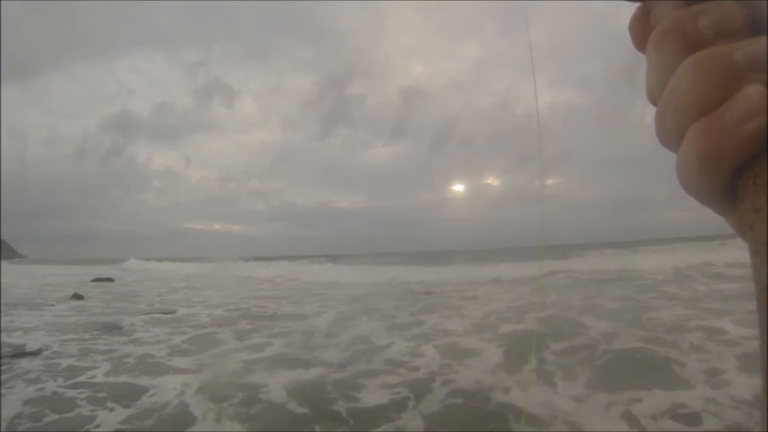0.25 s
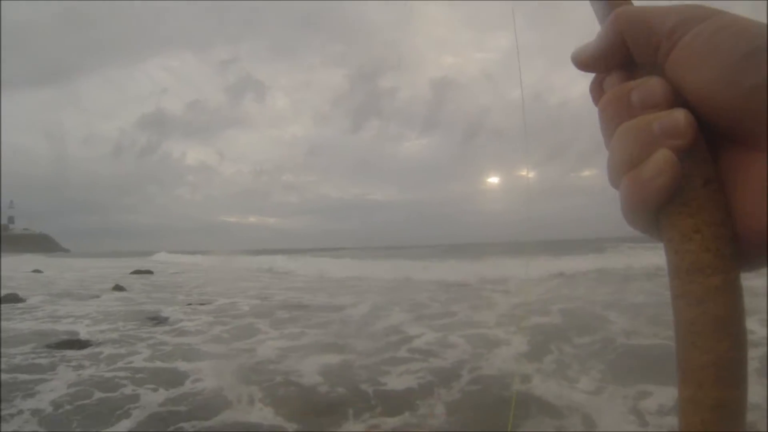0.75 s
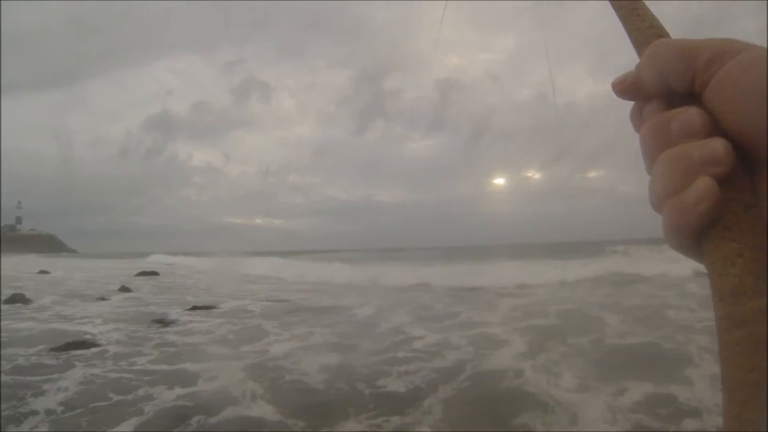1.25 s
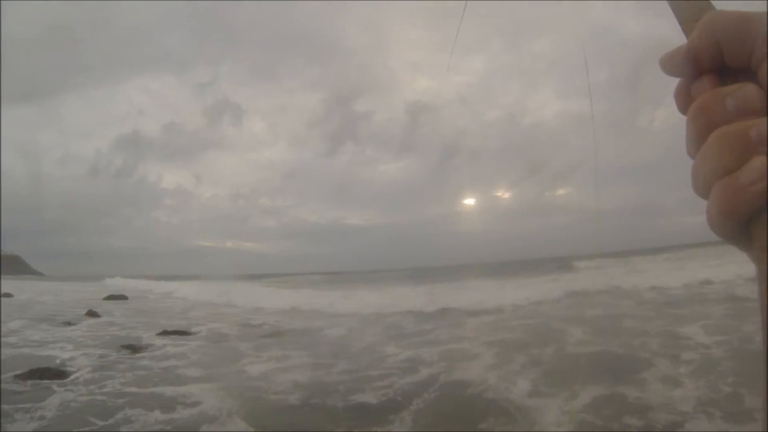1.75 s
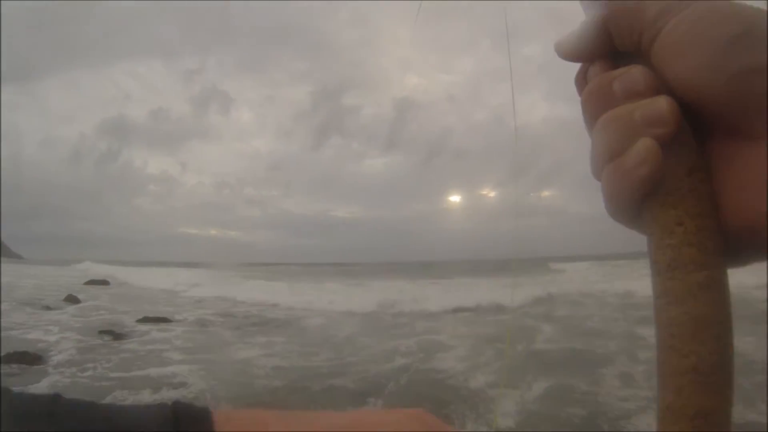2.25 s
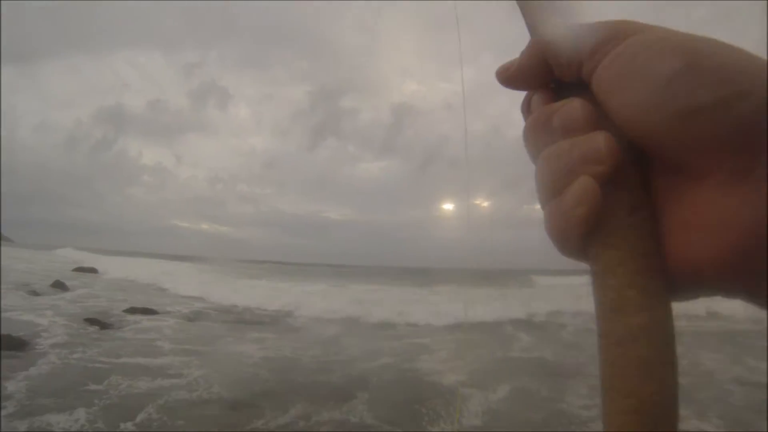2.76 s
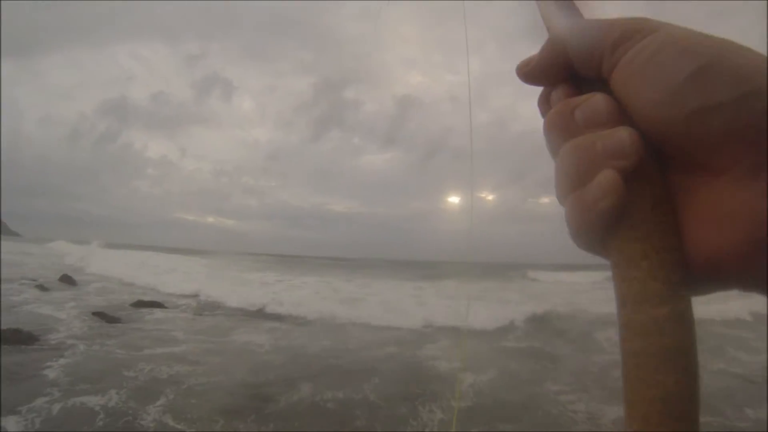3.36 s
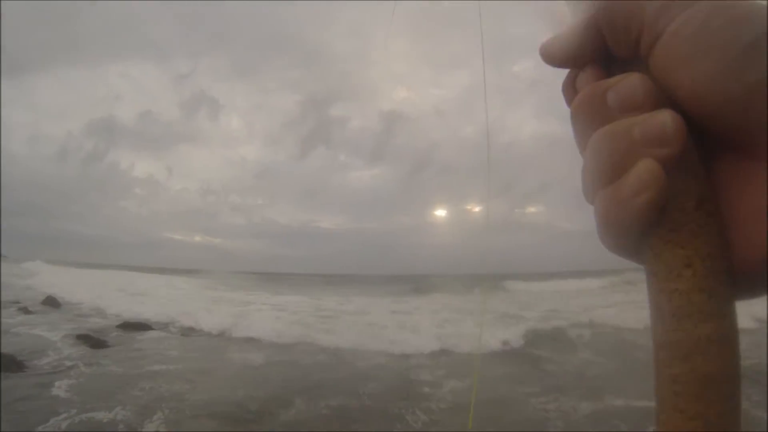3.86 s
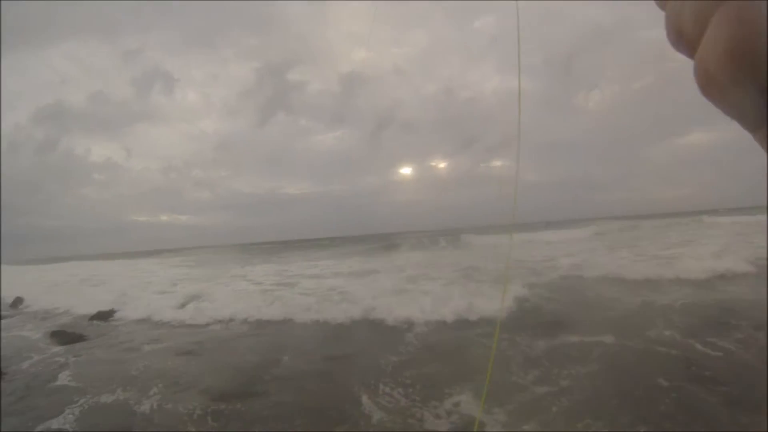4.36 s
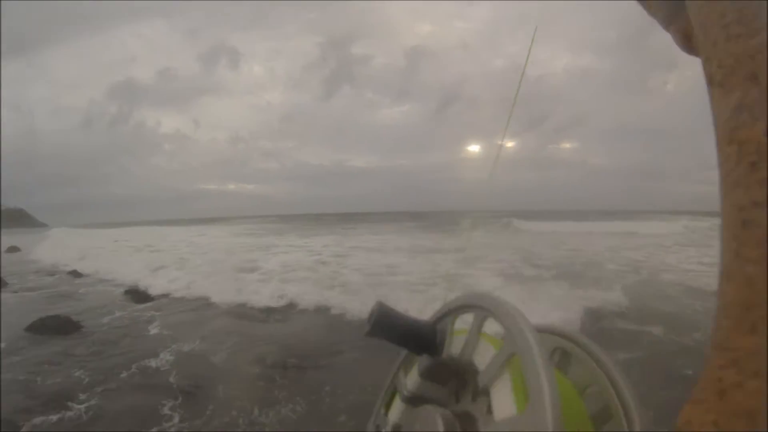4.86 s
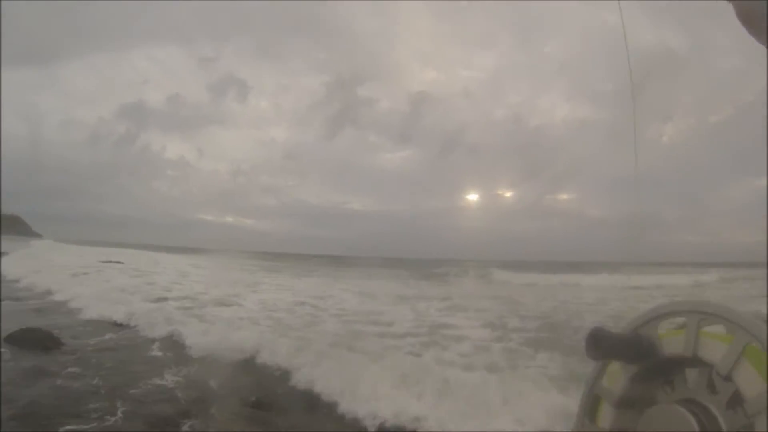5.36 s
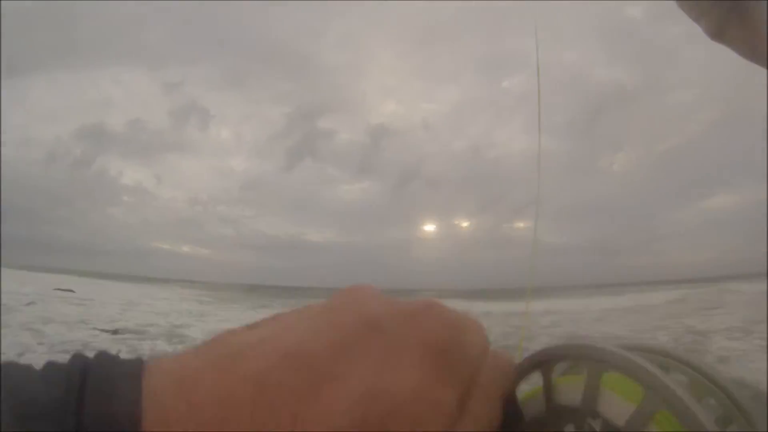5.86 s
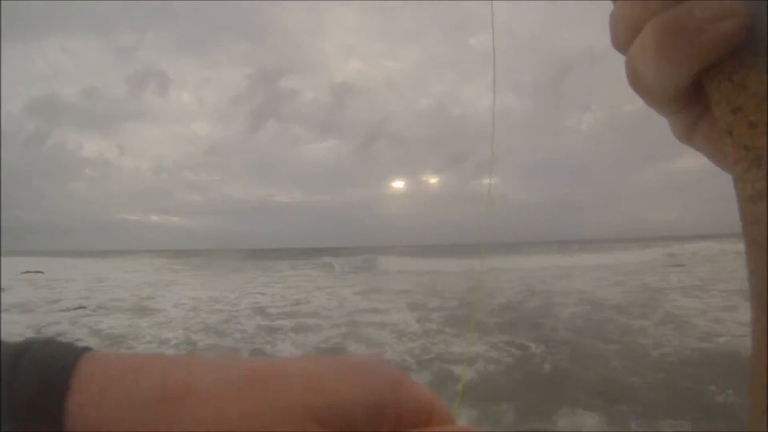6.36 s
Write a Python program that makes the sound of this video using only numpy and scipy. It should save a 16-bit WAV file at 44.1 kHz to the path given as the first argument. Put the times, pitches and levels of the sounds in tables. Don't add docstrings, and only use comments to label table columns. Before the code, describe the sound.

A boxy, muffled close microphone on a fisherman's chest picks up steady breaking waves outdoors. Soft low thuds and strap strain rise and fall with movement, dotted with tiny gritty clicks. Very quiet, high electronic ticking flutters in short runs above the hiss. Late on, a jerk brings two hard, hollow knocks close together and a short scrape, then the surf slides nearer and foamier.

```python
import sys
import numpy as np
from scipy import signal
from scipy.fft import rfft, irfft, next_fast_len
from scipy.io import wavfile
from scipy.ndimage import uniform_filter1d, map_coordinates

SR = 44100
rng = np.random.default_rng(int(sys.argv[2]) if len(sys.argv) > 2 else 0)


def generate_wav(sig):
    pcm = np.round(np.clip(np.atleast_2d(sig).T, -1, 1) * 32767).astype(np.int16)
    wavfile.write(sys.argv[1], SR, pcm)


def decibels_to_gain(level_db):
    exponent = np.asarray(level_db, float) / 20
    return 10 ** exponent


N = 291942
TIME = np.arange(N) / SR

# (time [s], level [dB])
SURGE = [(0.0, -70.5), (0.48, -71.5), (0.87, -66.5), (1.4, -67), (1.58, -60), (1.75, -65.5), (1.95, -69),
         (2.36, -69.5), (2.71, -69), (2.95, -66.5), (3.98, -67.5), (4.66, -67), (4.92, -63.5),
         (5.07, -62.5), (5.42, -65.5), (6.4, -63.5), (6.62, -64.5)]
# (frequency [Hz], level [dB])
ROAR = [(150, -38), (300, -2), (700, -1.5), (1000, -4.5), (2000, -33)]
WASH = [(500, -33), (900, -5.5), (1400, 3), (2800, 0.5), (4000, -13), (8000, -37)]
FOAM = [(1500, -46), (3000, 4), (5000, 5.5), (8000, -0.5), (12000, -8), (16000, -13)]
# (centre [Hz], width [Hz], level [dB])
HOUSING = [(380, 280, -7), (642, 202, -0.5), (1025, 820, -16.5), (1376, 390, 1.5), (2096, 425, -4.5),
           (2595, 450, -12.5), (3500, 300, -5.5), (4090, 1560, -9), (5200, 990, -8.5), (6480, 750, -8),
           (7500, 330, -11), (10700, 6000, -9.5)]
RUNUP_S, RUNUP_LASTS_S = 3.94, 2.8
ROAR_DB, ROAR_FOLLOWS, ROAR_NEAR_DB = -68.5, 0.37, -1
ROAR_TURNS = 0.22
WASH_DB = -66.5
FOAM_DB, FOAM_FOLLOWS, FOAM_NEAR_DB = -79, 0.31, 7.5

# (time [s], level [dB])
EFFORT = [(0.0, -65), (0.61, -64.5), (0.81, -53), (1.23, -60), (1.53, -54.5), (1.64, -55.5), (2.4, -65),
          (2.84, -59), (2.97, -61.5), (3.82, -61), (3.95, -59), (4.35, -61), (4.85, -56), (5.33, -54),
          (5.46, -59), (5.79, -64.5), (6.05, -64), (6.62, -62)]
# (frequency [Hz], level [dB])
BUFFET = [(6, -41), (18, 5.5), (40, 6.5), (60, -18), (120, -43.5)]
SWAY = [(25, -33), (55, -4.5), (90, -6), (120, -0.5), (160, -11.5), (250, -34), (500, -72)]
STRAP = [(90, -52), (170, 1.5), (230, -1), (290, -1), (350, -11.5), (500, -24.5), (1000, -53)]
# (time [s], length [s], extra strain [dB])
PULLS = [
    (.76, .2, 0.5),
    (1.14, 0.43, 4),
    (1.703, 1, 4),
    (3.845, 0.46, 7),
    (4.495, 0.082, 9),
    (4.817, .14, 23),
    (5.52, 0.64, -2.5),
    (6.4, 0.77, 3),
]
BUFFET_DB, BUFFET_FOLLOWS, BREEZE_DB_PER_S = -67, .45, .6
SWAY_DB, STRAP_DB, STRAP_FOLLOWS = -57, -66, 0.52

# (frequency [Hz], level [dB])
HISS = [(200, 0), (3000, -4), (8000, -9), (11000, -8), (12800, -10), (16000, -12)]
# (time [s], bursts, spacing [ms], shift of every second burst [ms])
WRITES = [(.0345, 2, 33.4, -7), (.1163, 2, 48, 0), (.2021, 7, 33.4, -8), (.4445, 2, 19, 0),
          (.5036, 3, 33, 0), (2.0282, 2, 33.9, 0), (2.1065, 5, 32, -7), (2.2728, 5, 33.4, -8),
          (2.42, 2, 23, 0), (2.5005, 11, 34, -4.5), (2.9, 4, 23.5, 0), (3.006, 7, 33, 0),
          (3.2705, 4, 33, 0), (3.411, 4, 21, 0), (3.5041, 2, 36, 0), (3.607, 4, 33, 5), (3.7552, 2, 177, 0),
          (4.213, 7, 23.7, 0), (4.371, 7, 21.5, 0), (4.535, 7, 21.5, 0), (4.693, 4, 30, 0),
          (4.8649, 1, 0, 0), (4.88, 5, 20.2, 0), (4.983, 3, 27, 0), (6.502, 4, 19.7, 0), (6.606, 1, 0, 0)]
# (delay [ms], length [ms], frequency [Hz], level [dB], pitch scatter [Hz])
STEPS = [(-1.5, .9, 12800, -1, 150), (-1.6, 1.5, 9850, -6, 60), (-.55, .3, 11000, 3, 100),
         (-.45, 1.7, 11600, 4, 30), (4.1, .7, 9850, -2, 100), (4.3, .3, 12500, -3, 500),
         (-1.2, .6, 14400, -9, 300), (5.8, .9, 11300, -4, 900), (7.4, .7, 11000, -6, 1100)]
WRITE_DB, WRITE_SCATTER_DB, WRITE_SCATTER_MS = -70, .7, .8
# (time [s], length [s])
WHINES = [
    (.63, .14),
    (5.065, 0.12),
]
WHINE_HZ, WHINE_STARTS_HIGH_HZ, WHINE_SETTLES_S = 9850, 500, .06
WHINE_DB, UPPER_DB, WHINE_EDGE_S = -82, -86, .012

# (time [s], level [dB], centre [Hz], width [Hz], contact length [ms])
TICKS = [(.848, -62, 2430, 800, 4.5), (.846, -73, 3700, 700, 6), (.846, -73, 5200, 600, 5),
         (1.1348, -73, 6900, 2500, 2.3), (1.379, -59, 2220, 1530, 26), (1.38, -66.5, 3670, 1800, 2.8),
         (1.4245, -73, 5000, 2000, 2.3), (1.5374, -76, 3700, 1500, 4), (2.5435, -58.5, 1720, 500, 3.5),
         (2.545, -63.5, 3000, 1300, 4.3), (2.5435, -74, 5000, 1200, 4.4), (2.9395, -60, 1500, 500, 5.7),
         (2.9388, -65, 2450, 700, 3.1), (2.939, -67.5, 3500, 700, 5.5), (3.2715, -72, 3400, 2200, 5.4),
         (3.5798, -66, 2800, 2400, 5), (3.71, -75, 6500, 5000, 3), (3.9409, -69.5, 3000, 2400, 4.1),
         (4.2274, -81, 3500, 2000, 4), (5.0835, -60, 1430, 400, 3.4)]
# (time [s], level [dB], centre [Hz], width [Hz], length [ms])
CRACKS = [
    (4.7396, -52, 1200, 490, 3.2),
    (4.7389, -48.5, 1770, 1850, 2.5),
    (6.3, -80, 4100, 4000, 2.5),
    (4.788, -44.5, 800, 1100, 1.4),
    (4.7887, -48, 2440, 610, 0.86),
    (4.789, -65, 11200, 4000, 7.1),
    (4.789, -68, 6900, 5500, 8.8),
    (4.8028, -77, 10000, 5000, 1),
]
TICK_CYCLES, CRACK_CYCLES = 80, 17

# (time [s], length [s], level [dB], change to its end [dB])
SCRAPES = [
    (2.712, 0.11, -69.5, 1),
    (4.189, 0.13, -65, 0),
    (4.744, 0.011, -60, -3),
    (4.75, 0.017, -64.5, -7),
    (4.778, 0.053, -55, 1),
    (4.839, .028, -54.5, -6.5),
]
# (centre [Hz], width [Hz], level [dB])
RUB_MODES = [(2186, 180, 6), (1300, 640, -6.0), (3500, 570, -11)]
SCRAPE_ATTACK_S, SCRAPE_RELEASE_S, EDGE_DB = 0.0097, 0.0092, 20

# (centre [Hz], width [Hz], level [dB])
KNOCKS = [
    ((4.495, 5, .014, .8), [(110, 70, -4), (300, 200, -2)]),
    ((4.7394, 5.6, -.94, .785), [(58, 28, -11), (92, 50, -8.7), (280, 75, 2.5), (520, 280, -.5), (640, 50, 4)]),
    ((4.741, 14, .04, 1), [(14, 60, 0)]),
    ((4.752, 32, -.035, 1), [(14, 60, 0)]),
    ((4.785, 28, .028, 1), [(14, 60, 0)]),
    ((4.7884, 6.8, -.94, .896), [(144, 33, -4), (268, 38, 4.4), (419, 165, -1.1)]),
    ((4.822, 20, -.05, 1), [(14, 60, 0), (141, 60, -6)]),
]

# (frequency [Hz], level [dB per Hz])
TOP_BAND_FLOOR = [(12600, -140), (12900, -125), (13400, -124), (13700, -120), (14000, -123.5),
                  (14900, -125), (15100, -118)]


def unit(x):
    return x / np.sqrt(np.mean(x ** 2) + 1e-20)


def swing(rows):
    level_db = np.interp(TIME, *np.transpose(rows))
    return level_db - level_db.mean()


def wobble(rate):
    knots = rng.standard_normal(int(N * rate / SR) + 4)
    return map_coordinates(knots, [np.arange(N) * rate / SR])


def filtered(x, response):
    m = next_fast_len(N + SR // 2)
    return irfft(rfft(x, m) * response(np.fft.rfftfreq(m, 1 / SR)), m)[:N]


def modes(table, sign=1):
    def response(f):
        return sum(sign ** k * decibels_to_gain(db) * 1j * f * width / (centre ** 2 - f * f + 1j * f * width)
                   for k, (centre, width, db) in enumerate(table))
    return response


def rush(spectrum, patchy_db, shell=lambda f: 1):
    z = signal.stft(rng.standard_normal(N), nperseg=512)[2]
    field = uniform_filter1d(rng.standard_normal(z.shape), 6, 0)
    field = uniform_filter1d(field, 10, 1)
    noise = signal.istft(z * decibels_to_gain(patchy_db * unit(field)), nperseg=512)[1][:N]
    f, db = np.transpose(spectrum)
    return unit(filtered(noise, lambda hz: decibels_to_gain(np.interp(np.log(hz + 1), np.log(f), db)) * shell(hz)))


def add(track, s, sound):
    part = track[round(s * SR):][:len(sound)]
    part += sound[:len(part)]


def hold_db(s, length, attack, release):
    t = TIME - s
    return EDGE_DB * np.minimum(0, np.minimum(t / attack - 1, (length - t) / release))


def surf():
    surge_db = swing(SURGE)
    near = np.clip((TIME - RUNUP_S) / RUNUP_LASTS_S, 0, 1)
    shell, swell = modes(HOUSING), wobble(8)
    roar_db = ROAR_DB + ROAR_FOLLOWS * surge_db + ROAR_NEAR_DB * near + ROAR_TURNS * swing(EFFORT)
    wash_db = WASH_DB + surge_db
    foam_db = FOAM_DB + FOAM_FOLLOWS * surge_db + FOAM_NEAR_DB * near
    roar = decibels_to_gain(roar_db + .5 * swell) * rush(ROAR, patchy_db=2.0, shell=shell)
    wash = decibels_to_gain(wash_db + .5 * swell + 0.91 * wobble(18)) * rush(WASH, patchy_db=0.95, shell=shell)
    foam = decibels_to_gain(foam_db + 0.19 * swell) * rush(FOAM, patchy_db=1.9, shell=shell)
    return roar + wash + foam


def harness():
    effort_db = swing(EFFORT)
    pull_db = sum(db * np.clip(1 - 2 * np.abs(TIME - s) / length, 0, 1) for s, length, db in PULLS)
    lumps = wobble(20)
    buffet = unit(decibels_to_gain(1.4 * lumps) * rush(BUFFET, patchy_db=2.0))
    sway = unit(decibels_to_gain(1.4 * lumps) * rush(SWAY, patchy_db=1.06))
    strap = unit(decibels_to_gain(1.1 * lumps + 0.83 * wobble(25)) * rush(STRAP, patchy_db=0.2))
    buffet_db = BUFFET_DB + BREEZE_DB_PER_S * TIME + BUFFET_FOLLOWS * effort_db
    strap_db = STRAP_DB + STRAP_FOLLOWS * effort_db + pull_db
    return decibels_to_gain(buffet_db) * buffet + decibels_to_gain(SWAY_DB + effort_db) * sway + decibels_to_gain(strap_db) * strap


def hiss():
    return decibels_to_gain(-80.5) * rush(HISS, patchy_db=.4)


def card_writes():
    out, t = np.zeros(N), np.arange(SR // 200) / SR
    for start, bursts, spacing, shift in WRITES:
        for k in range(int(bursts)):
            late, strong = rng.standard_normal(2)
            s = start + (k * spacing + k % 2 * shift + WRITE_SCATTER_MS * late) / 1000
            for delay, ms, hz, step_db, scatter in STEPS:
                bend, size = rng.standard_normal(2)
                gate = np.clip(np.minimum(t, ms / 1000 - t) / .00013, 0, 1) * decibels_to_gain(-2500 * t)
                tone = np.sin(2 * np.pi * (hz + scatter * bend) * t)
                db = WRITE_DB + WRITE_SCATTER_DB * strong + step_db + scatter / 400 * size
                add(out, s + delay / 1000, decibels_to_gain(db) * gate * tone)
    return out


def coil_whine():
    out = np.zeros(N)
    for s, length in WHINES:
        since = np.maximum(TIME - s, 0)
        glide_hz = WHINE_STARTS_HIGH_HZ * np.exp(-since / WHINE_SETTLES_S)
        hz = WHINE_HZ + glide_hz + 60 * wobble(30) + 90 * wobble(300)
        phase = 2 * np.pi * np.cumsum(hz) / SR
        held = decibels_to_gain(hold_db(s, length, WHINE_EDGE_S, WHINE_EDGE_S))
        out += held * (decibels_to_gain(WHINE_DB) * np.sin(phase) + decibels_to_gain(UPPER_DB) * np.sin(phase * 3 / 2))
    return out


def ticks(contacts, cycles):
    out, t = np.zeros(N), np.arange(4096) / SR
    f = np.fft.rfftfreq(len(t), 1 / SR)
    shell = modes(HOUSING)(f) * (f / 1400) ** .8 + .12
    for s, db, hz, width, ms in contacts:
        decay = decibels_to_gain(-60 * np.maximum(t - ms / 1000, 0) * hz / cycles)
        grit = rng.standard_normal(len(t)) * decay * (1 - np.exp(-t / .0004))
        tick = irfft(rfft(grit) * modes([(hz, width, 0)])(f) ** 3 * shell, len(t))
        add(out, s, decibels_to_gain(db + 27) * tick / np.linalg.norm(tick))
    return out


def scrapes():
    level = 0
    for s, length, db, change_db in SCRAPES:
        drift_db = change_db * np.clip((TIME - s) / length, 0, 1)
        level = level + decibels_to_gain(db + drift_db + hold_db(s, length, SCRAPE_ATTACK_S, SCRAPE_RELEASE_S))
    friction = rng.standard_normal(N) * decibels_to_gain(1.5 * wobble(90))
    rub = modes(RUB_MODES, sign=-1.16)
    return level * unit(filtered(friction, lambda f: rub(f) / (1 + (f / 4000) ** 2)))


def knocks():
    out, t = np.zeros(N), np.arange(SR) / SR
    for (s, ms, size, softness), mount in KNOCKS:
        push = size * np.sin(np.pi * np.clip(t * 1000 / ms, 0, 1) ** softness) ** 2
        add(out, s, irfft(rfft(push) * modes(mount)(np.arange(SR // 2 + 1)), SR))
    return out


def scene():
    electronics = hiss() + card_writes() + coil_whine()
    contacts = ticks(TICKS, TICK_CYCLES) + ticks(CRACKS, CRACK_CYCLES)
    return (surf() + harness() + electronics + contacts + scrapes() + knocks())[None]


def top_cut(x):
    return signal.sosfilt(signal.butter(12, 15190, fs=SR, output="sos"), x)


def record(dry):
    hz, _, z = signal.stft(dry, SR, nperseg=2048, scaling="psd")
    patch = uniform_filter1d(np.abs(z) ** 2, size=6, axis=1)
    floor = decibels_to_gain(np.interp(hz, *np.transpose(TOP_BAND_FLOOR), left=-300)) ** 2
    kept = signal.istft(z * (patch > floor[:, None]), SR, nperseg=2048, scaling="psd")[1][:, :N]
    return top_cut(kept)


dry = scene()
out = record(dry)
generate_wav(out)
```